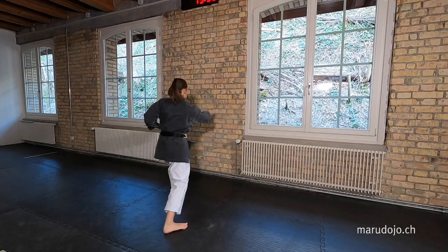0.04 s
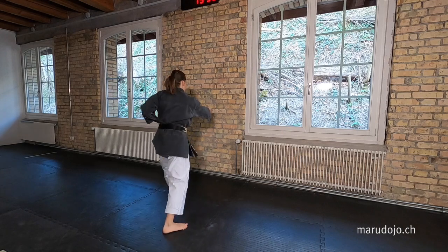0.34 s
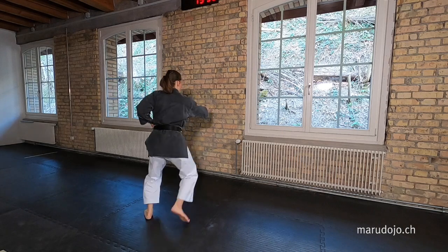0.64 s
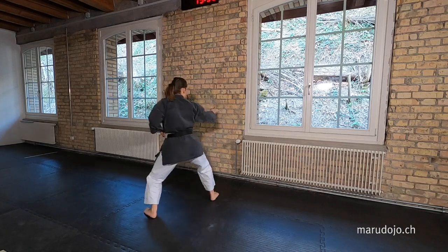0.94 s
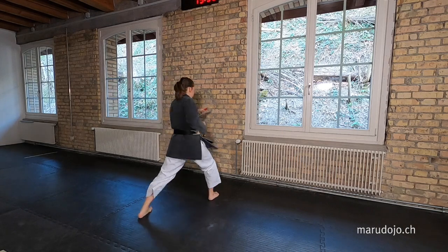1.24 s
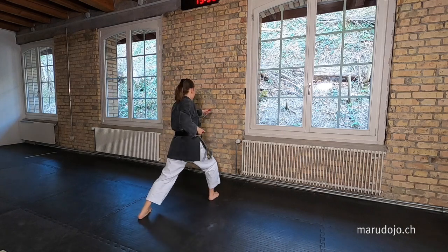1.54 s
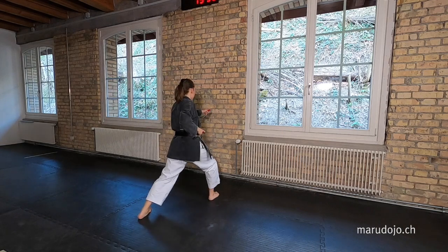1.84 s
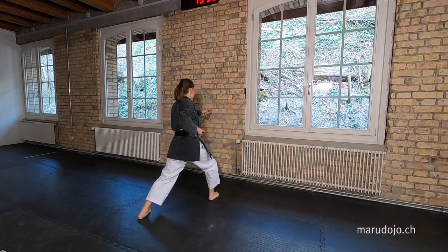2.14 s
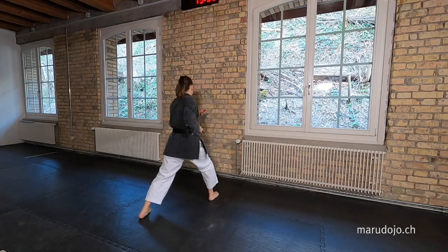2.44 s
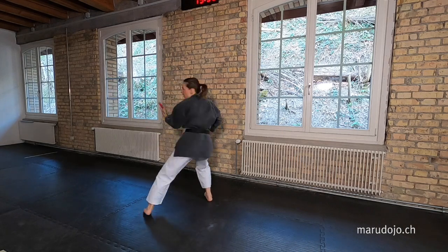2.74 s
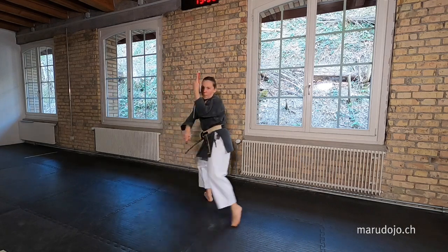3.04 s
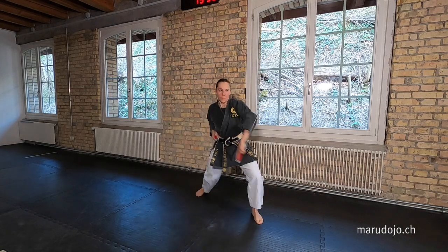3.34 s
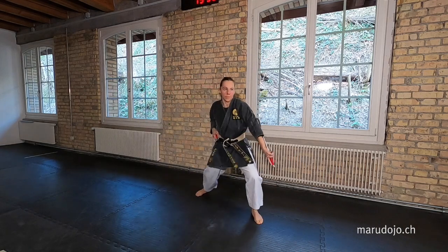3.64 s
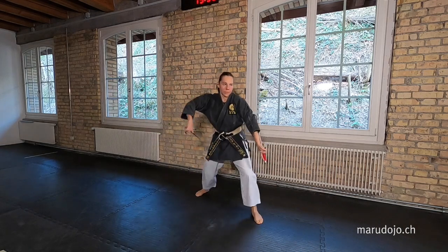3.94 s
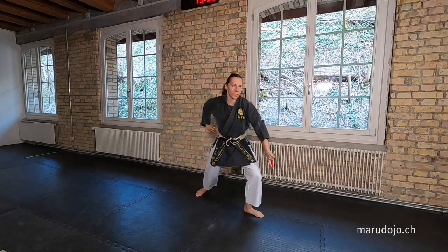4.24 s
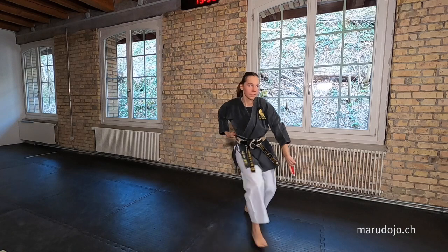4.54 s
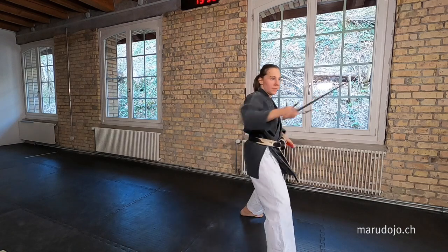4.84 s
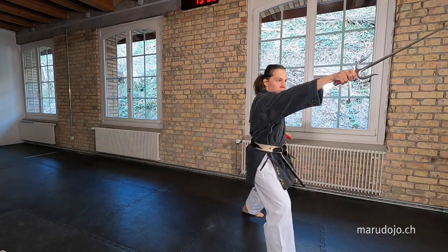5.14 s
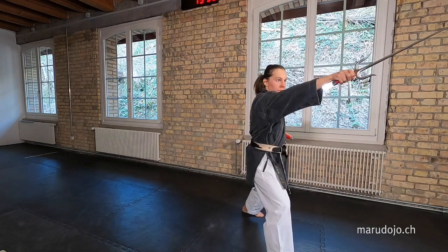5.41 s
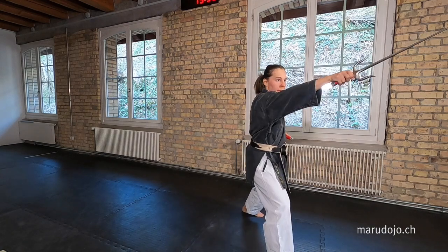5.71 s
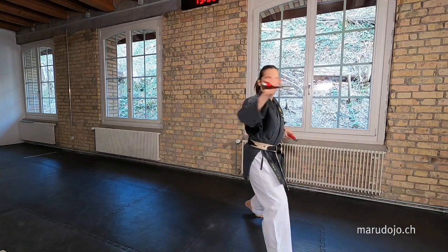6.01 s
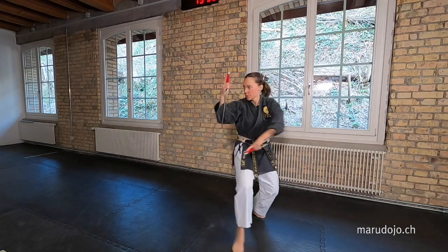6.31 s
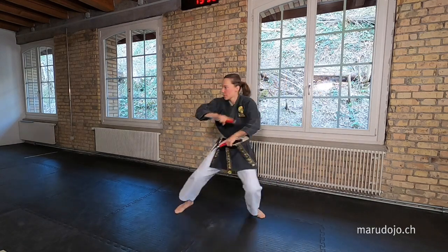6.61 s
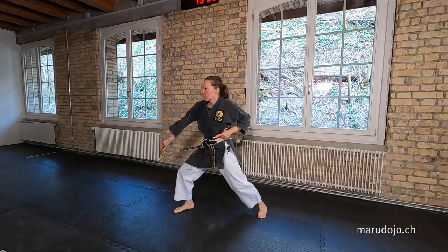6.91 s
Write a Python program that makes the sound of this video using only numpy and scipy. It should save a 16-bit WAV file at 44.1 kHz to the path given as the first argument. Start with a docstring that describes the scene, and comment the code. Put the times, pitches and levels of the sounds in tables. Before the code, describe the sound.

In a quiet training hall, cloth slides, flaps and snaps as someone steps and strikes in a thick cotton uniform. After a short lull come two stronger flurries, with swishes of arms and steel weapons and dull barefoot landings. A barely audible wavering tone rises in the next pause, then one last burst of rustling ends with a thump. The stereo microphone picks up the movements clearly, along with a light echo.

```python
"""A heavy cotton uniform rustles as a martial artist steps, turns and strikes with short steel weapons.
Each move starts with cloth sliding on cloth, sweeps through the air with a swish, and ends with sleeves
and trouser legs flapping. Folds crack as they snap tight, bare feet thump on the mat, and the brick
training hall echoes. In a pause, a faint tone rises just above the still air."""
import sys
import numpy as np
from scipy import signal
from scipy.fft import rfft, irfft, next_fast_len
from scipy.io import wavfile
from scipy.ndimage import uniform_filter1d, map_coordinates

SR = 44100
rng = np.random.default_rng(int(sys.argv[2]) if len(sys.argv) > 2 else 0)


def put_to_file(sound):
    """Save the sound as 16-bit audio at rate SR, in the file named by the first command-line argument."""
    columns = np.atleast_2d(sound).T  # one column per channel
    safe = np.clip(columns, -1, 1)
    whole_steps = np.round(safe * 32767)
    wavfile.write(sys.argv[1], SR, whole_steps.astype(np.int16))


N = 307377

# loose cloth flapping as a limb speeds up or stops dead:
# (time of full strength [s], rise [s], hold [s], flap strength [dB], gust strength [dB])
CLOTH_FLAPS = [(0.0, 0.028, 0.078, -48.5, -54), (0.472, 0.084, 0.051, -52, -88),
               (0.714, 0.083, 0.045, -50, -54), (1.02, 0.16, 0.094, -50.5, -58),
               (1.186, 0.019, 0.057, -40.5, -63), (1.38, 0.16, 0.058, -40, -44),
               (1.521, .06, 0.07, -52, -47), (2.584, 0.0097, 0.4, -58, -94),
               (3.032, 0.18, 0.018, -48.5, -69), (3.1, .08, 0.13, -53.5, -79),
               (3.387, 0.1, .04, -44.5, -51.5), (3.489, 0.076, 0.039, -45, -50),
               (4.01, 0.13, 0.032, -60, -67), (4.465, 0.14, 0.07, -45.5, -48.5),
               (4.567, 0.031, .05, -41, -47.5), (4.767, 0.069, .03, -58, -51.5),
               (4.862, .05, 0.029, -47.5, -48), (5.017, 0.076, 0.064, -42.5, -49),
               (5.227, .05, 0.097, -62.5, -65.5), (6.345, 0.08, 0.014, -44.5, -60),
               (6.452, 0.086, 0.074, -46.5, -49.5), (6.83, 0.11, 0.026, -39.5, -43.5)]
# how alike left and right are for direct sound: (frequency [Hz], likeness [1 = the same])
DIRECT_LIKENESS = [(60, 1), (1000, 0.92), (2200, 1), (4500, 0.6), (9000, 0.16), (13000, .2)]
# and for sound from all around: (frequency [Hz], likeness [1 = the same])
ROOM_LIKENESS = [(40, 0.29), (150, 0.72), (1000, 0.49), (4000, -0.07), (9000, -0.017)]


def uniform():
    """Moving limbs rub the cloth and sweep the air; flapping cloth adds a little of both."""
    # arm and leg strokes: (time of full speed [s], rise [s], hold [s], rubbing [dB],
    # fizz relative to rubbing [dB], swept air [dB])
    strokes = [(0.0, 0.06, 0.015, -54.5, -11.5, -49), (0.293, 0.23, 0.071, -60, -13, -62),
               (0.439, 0.016, 0.069, -46.5, -7, -46.5), (0.55, 0.089, 0.12, -47, -7, -49),
               (0.783, 0.26, 0.044, -57, -15, -52.5), (0.94, .03, .14, -52.5, -10, -52.5),
               (1.18, 0.09, 0.091, -49, -6, -46.5), (1.29, 0.076, 0.1, -46, -17, -38.5),
               (2.543, 0.15, .03, -63, -7.5, -65.5), (2.583, .02, .03, -53, -10, -62),
               (2.705, 0.091, 0.065, -51, -8, -56), (2.903, 0.11, .04, -50.5, -9.5, -52),
               (2.982, 0.068, 0.075, -35.5, -7.5, -42), (3.196, 0.13, 0.055, -50, -20, -43.5),
               (3.272, 0.077, 0.022, -41.5, -11, -44.5), (3.367, 0.088, 0.096, -51.5, -11.5, -42),
               (3.973, 0.43, 0.081, -67, -4.5, -68.5), (4.102, 0.016, .05, -56, -11, -59),
               (4.256, 0.16, 0.069, -48, -8.5, -53), (4.493, 0.11, 0.032, -44.5, -4.5, -39.5),
               (4.574, 0.067, 0.01, -37.5, -7.5, -39), (4.818, 0.13, 0.14, -47, -13, -48),
               (5.23, 0.069, 0.044, -65, -7, -61), (5.924, 0.12, .08, -65, -6.5, -67.5),
               (6.07, 0.19, 0.055, -64, -7.5, -57.5), (6.216, 0.16, 0.089, -52, -11, -53),
               (6.355, 0.065, 0.036, -39.5, -9, -45.5), (6.426, 0.013, 0.073, -37.5, -8.5, -38),
               (6.722, .05, 0.049, -42.5, -11, -41)]
    flaps = [(*when, db) for *when, db, gust in CLOTH_FLAPS]
    rubs = [(*when, db) for *when, db, fizz, air in strokes]
    rubs += [(*when, db - 9) for *when, db in flaps]
    fizzes = [(*when, db + fizz) for *when, db, fizz, air in strokes]
    sweeps = [(*when, air) for *when, db, fizz, air in strokes]
    sweeps += [(*when, db - 5) for *when, db in flaps]
    return (rubbing(sliding_level(rubs), sliding_level(fizzes))
            + sweeping(level(sweeps, fall_db_per_s=126))
            + flapping(level(flaps, fall_db_per_s=166)))


def rubbing(rub_db, fizz_db):
    """Cotton slides on cotton: the folds rasp and the weave fizzes, both with the same uneven stroke."""
    # tone of rubbing folds: (frequency [Hz], level [dB])
    rasp_tone = [(600, -31), (1100, -9), (1600, -6), (2200, -0.5), (3000, -3.5), (4000, -6.5),
                 (5200, -10.5), (7000, -16.5), (12000, -42)]
    # tone of the weave: (frequency [Hz], level [dB])
    fizz_tone = [(2000, -14), (4000, -3.5), (5500, -2.5), (7000, -9), (9000, -7.5), (12000, -20),
                 (14000, -24), (15500, -36)]
    unevenness = amp(0.49 * wobble(45))
    rasp = coloured(folds(slips(per_s=1500, scatter_db=3.5, smooth_db=5), patchy_db=1.5), rasp_tone)
    fizz = coloured(folds(slips(per_s=450, scatter_db=-2, smooth_db=6.5), patchy_db=2.5), fizz_tone)
    return unevenness * (amp(rub_db - 5) * rasp + amp(fizz_db - 2) * fizz)


def sweeping(sweep_db):
    """Sleeves and steel shafts cut the air with a hollow rush."""
    # tone of swept air: (frequency [Hz], level [dB])
    air_tone = [(200, -50), (450, -4), (650, -1.5), (950, -0.5), (1300, -2.5), (1800, -5.5), (3500, -47.5)]
    swirls = folds(slips(per_s=500, scatter_db=4.5, smooth_db=6.5), patchy_db=3)
    return amp(sweep_db - 4.5 + 0.24 * wobble(24)) * coloured(swirls, air_tone)


def flapping(flap_db):
    """Loose panels of cloth beat in quick uneven flicks."""
    # tone of flapping cloth: (frequency [Hz], level [dB])
    flap_tone = [(50, -44.5), (110, -9), (170, 4.5), (220, 2.5), (270, -0.5), (360, -0.5), (520, -3.5),
                 (800, -19), (2000, -66)]
    flicks = folds(slips(per_s=240, scatter_db=-1.5, smooth_db=1.5), patchy_db=0.5)
    return amp(flap_db - 4.5) * coloured(flicks, flap_tone)


def swishes():
    """Air swirls behind a fast arm and its weapon, with a hiss whose pitch follows their speed."""
    # fastest swings: (middle [s], length [s], level [dB], pitch [Hz], glide [octaves/s])
    swings = [(0.592, 0.13, -53.5, 653, -0.5), (1.30, 0.059, -49, 1188, -2), (2.967, 0.053, -47, 980, 7.5),
              (3.057, 0.091, -40, 1875, 3), (3.182, 0.076, -44.5, 827, -2), (4.6, 0.17, -47, 2170, -1),
              (4.835, 0.24, -53.5, 892, 1), (6.393, 0.078, -44.5, 860, 2.5),
              (6.583, 0.14, -50.5, 898, -4.5)]
    t = np.arange(-SR // 4, SR // 4) / SR
    track = np.zeros((2, N))
    for s, length, db, hz, glide in swings:
        noise = rng.standard_normal((2, len(t)))
        swirls = unit(filtered(noise, lambda f: 1 / (1 + (f / (0.25 * hz)) ** 4)))
        phase = 2 * np.pi * np.cumsum(hz * 2 ** (glide * t)) / SR
        hiss = swirls[0] * np.cos(phase) + swirls[1] * np.sin(phase)  # lifts low noise up to the pitch
        swell = np.exp(-2 * (t / length) ** 2)
        add(track, s + t[0], amp(db) * swell * hiss[None])
    return track


def snaps():
    """A fold pulled tight gives a short crack."""
    # snapping folds: (time [s], strength [dB], pitch [Hz], time to fade by 60 dB [s])
    cracks = [(0.43, -42.5, 1520, 0.044), (0.44, -34.5, 2220, 0.015), (0.477, -36, 3100, 0.083),
              (0.6875, -29, 2700, 0.0086), (1.181, -33, 760, 0.041), (1.215, -30, 970, 0.06),
              (1.362, -33, 1000, 0.03), (1.364, -34.5, 2400, 0.04), (1.559, -42.5, 1020, 0.13),
              (2.577, -49, 1310, 0.13), (2.581, -47, 3640, 0.11), (3.096, -33.5, 664, 0.069),
              (3.433, -38, 980, .04), (3.784, -49.5, 1270, 0.045), (4.1, -51.5, 930, 0.045),
              (4.383, -39.5, 1180, 0.044), (4.586, -30, 2600, 0.1), (4.755, -40, 776, 0.11),
              (5.047, -32, 700, 0.049), (5.227, -41.5, 1220, 0.097), (5.226, -44.5, 2500, 0.05),
              (6.034, -47.5, 1160, 0.032), (6.2371, -35, 1060, 0.076), (6.235, -35, 2620, 0.053),
              (6.688, -34, 740, 0.056)]
    track = np.zeros((2, N))
    for s, db, hz, fade_s in cracks:
        add(track, s, amp(db + 1.5) * burst(hz, fade_s, sharpness=2.6, attack_s=0.0002, dull_above=2.6))
    return track


def thumps():
    """Feet and heavy hems land softly, with almost no treble."""
    # dull blows: (time [s], strength [dB], pitch [Hz])
    blows = [(0.723, -36.5, 350), (1.188, -34.5, 188), (1.416, -32.5, 200), (3.353, -33, 310),
             (3.397, -29, 128), (4.533, -27, 271), (5.002, -25, 340), (5.041, -37, 414), (5.224, -38, 237),
             (6.06, -38, 328), (6.803, -27.5, 366), (6.827, -32.5, 102)]
    track = np.zeros((2, N))
    for s, db, hz in blows:
        thud = burst(hz, fade_s=0.12, sharpness=3.1, attack_s=0.0025, dull_above=9.5)
        add(track, s, amp(db - 4.5) * thud)
    return track


def floor():
    """The springy floor gives under each step with a deep rumble."""
    # weight landing: (time [s], strength [dB])
    steps = [(0.02, -61), (0.16, -63), (0.75, -51), (1.03, -45.5), (1.24, -52), (1.47, -52), (1.62, -55),
             (3.371, -54), (3.45, -52), (3.54, -50), (4.79, -48), (4.86, -46.5), (5.01, -45), (5.17, -61),
             (6.20, -57), (6.44, -62), (6.86, -49)]
    # tone of the bending floor: (frequency [Hz], level [dB])
    floor_tone = [(12, -21), (27, 16), (42, 2), (100, -46)]
    rise_s, hold_s = 0.065, 0.019
    bend_db = level([(s, rise_s, hold_s, db) for s, db in steps], fall_db_per_s=142)
    return amp(bend_db - 3.5) * coloured(rng.standard_normal((2, N)), floor_tone)


def gusts():
    """Fast limbs push a low puff of air with each flap."""
    # tone of pushed air: (frequency [Hz], level [dB])
    gust_tone = [(25, -32), (50, -2.5), (80, -1.5), (120, -0.5), (170, -7), (350, -54)]
    gust_db = level([(*when, gust) for *when, db, gust in CLOTH_FLAPS], fall_db_per_s=156)
    return amp(gust_db - 4) * coloured(rng.standard_normal((2, N)), gust_tone)


def hall(sound):
    """Brick walls and windows send back a blurred echo, boosted where the hall rings."""
    # how long the echo lasts: (frequency [Hz], time to fade by 60 dB [s])
    fade_times = [(150, 1.03), (700, 0.63), (1300, 1), (2200, 0.59), (4000, 0.66), (12000, 0.21)]
    # tone of the echo: (frequency [Hz], level [dB])
    echo_tone = [(100, -11.5), (200, -1), (500, -3), (800, -13.5), (1900, 0.5), (5000, -1.5), (9000, -5)]
    # where the hall rings: (frequency [Hz], width [Hz], boost [dB])
    rings = [(183, 46, 8.5), (332, 73, 0), (1200, 850, 9)]
    hz, t, bands = signal.stft(rng.standard_normal((2, SR)), SR, nperseg=256)
    fading = bands * amp(-60 * t / along(fade_times, hz)[:, None])
    tail = spread(signal.istft(fading, SR, nperseg=256)[1], ROOM_LIKENESS)
    tail = np.pad(tail / np.linalg.norm(tail[0]), ((0, 0), (SR // 200, 0)))  # arrives 5 ms late
    echo = signal.fftconvolve(sound, tail, axes=1)[:, :N]
    ring_db = lambda f: sum(db / (1 + (2 * (f - centre) / width) ** 2) for centre, width, db in rings)
    return filtered(echo, lambda f: amp(along(echo_tone, f) + ring_db(f)))


def faint_tone():
    """A thin, wavering tone rises in the pause."""
    # path of the tone: (time [s], pitch [Hz], level [dB])
    path = [(5.4, 490, -100), (5.55, 515, -71), (5.72, 561, -69.5), (5.9, 586, -97)]
    times, pitches, levels = np.transpose(path)
    t = np.arange(N) / SR
    hz = np.interp(t, times, pitches) * (1 + 0.045 * wobble(33))
    return amp(np.interp(t, times, levels)) * np.sin(2 * np.pi * np.cumsum(hz) / SR)


def still_air():
    """The quiet hall has a steady, low hush."""
    # tone of the hush: (frequency [Hz], level [dB])
    hush_tone = [(15, -34.5), (25, -5), (98, -27.5), (146, -5), (344, -13.5), (383, -13.5), (462, -18),
                 (515, -10), (573, -23.5), (655, -17.5), (709, -23), (790, -26), (879, -23), (1280, -22.5),
                 (15000, -52)]
    return amp(-69) * coloured(rng.standard_normal((2, N)), hush_tone, ROOM_LIKENESS)


def level(movements, fall_db_per_s):
    """Joint level in dB of (time, rise, hold, dB) movements: each builds up, holds, then dies away."""
    t = np.arange(0, N / SR, 0.002)
    power = 0
    for s, rise, hold, db in movements:
        rise_db = -20 * np.minimum((t - s) / rise, 0) ** 2
        fall_db = -fall_db_per_s * np.maximum(t - s - hold, 0)
        power += amp(db + rise_db + fall_db) ** 2
    return np.interp(np.arange(N) / SR, t, 10 * np.log10(power + 1e-20))


def sliding_level(movements):
    """Level in dB of sliding cloth: each stroke plus its quieter, slower settling."""
    usual_db = np.mean([db for *when, db in movements])
    # settling varies a little less than the strokes do
    settling = [(*when, usual_db - 5 + 0.91 * (db - usual_db)) for *when, db in movements]
    stroke_power = amp(level(movements, fall_db_per_s=134)) ** 2
    settle_power = amp(level(settling, fall_db_per_s=50.5)) ** 2
    return 10 * np.log10(stroke_power + settle_power)


def slips(per_s, scatter_db, smooth_db):
    """Tiny jerks of uneven size at random moments, over a smooth rubbing noise."""
    moments = rng.random(N) < per_s / SR
    sizes = amp(scatter_db * np.clip(rng.standard_normal(N), -2, 2))
    jerks = unit(moments * sizes * rng.standard_normal((2, N)))
    return unit(jerks + amp(smooth_db) * rng.standard_normal((2, N)))


def folds(pair, patchy_db):
    """Shifting folds briefly make some pitches louder and others softer."""
    bands = signal.stft(pair, nperseg=512)[2]
    patches = uniform_filter1d(rng.standard_normal(bands.shape[1:]), size=5, axis=0)  # blur in pitch
    patches = uniform_filter1d(patches, size=8, axis=1)  # blur in time
    return signal.istft(bands * amp(patchy_db * unit(patches)), nperseg=512)[1][:, :N]


def burst(hz, fade_s, sharpness, attack_s, dull_above):
    """A dying puff of peak 1 that rings at hz; soft cloth dulls it beyond dull_above times hz."""
    t = np.arange(SR // 4) / SR
    grain = np.sign(rng.standard_normal((2, len(t))))
    puff = grain * amp(-60 * t / fade_s) * (1 - np.exp(-t / attack_s))
    width = hz / sharpness
    ringing = lambda f: 1j * f * width / (hz * hz - f * f + 1j * f * width)
    dulling = lambda f: 1 / (1 + 1j * f / (dull_above * hz)) ** 2
    ring = spread(filtered(puff, lambda f: ringing(f) * dulling(f)), DIRECT_LIKENESS)
    return ring / np.abs(ring).max()


def coloured(pair, tone, likeness=DIRECT_LIKENESS):
    """Two noises become one stereo sound of strength 1 with the given tone."""
    return unit(spread(filtered(pair, lambda hz: amp(along(tone, hz))), likeness))


def spread(pair, likeness):
    """Blend two unrelated signals into a left and right that are partly alike."""
    angle = lambda hz: np.arccos(np.clip(along(likeness, hz), -1, 1)) / 2
    mid, side = filtered(pair, lambda hz: np.array([np.cos(angle(hz)), np.sin(angle(hz))]))
    return np.array([mid + side, mid - side])


def filtered(x, gain_at):
    """Scale each frequency in x by gain_at(frequency)."""
    n = x.shape[-1]
    padded = next_fast_len(n + 8192)
    return irfft(rfft(x, padded) * gain_at(np.fft.rfftfreq(padded, 1 / SR)), padded)[..., :n]


def along(points, hz):
    """Read between (frequency, value) points on a log frequency scale."""
    frequencies, values = np.transpose(points)
    return np.interp(np.log(hz + 1), np.log(frequencies + 1), values)


def wobble(per_s):
    """A smooth curve through per_s random points a second."""
    return map_coordinates(rng.standard_normal(int(N * per_s / SR) + 4), [np.arange(N) * per_s / SR])


def amp(db):
    """Turn decibels into a gain."""
    return 10 ** (np.asarray(db) / 20)


def unit(x):
    """Scale x to an average strength (rms) of 1."""
    return x / np.sqrt(np.mean(x ** 2) + 1e-20)


def add(track, s, sound):
    """Mix a sound into the track at s seconds."""
    part = track[:, max(round(s * SR), 0):][:, :sound.shape[1]]
    part += sound[:, :part.shape[1]]


def scene():
    """The moving uniform and its blows in the quiet hall."""
    cloth = uniform() + swishes()
    blows = snaps() + thumps()
    hush = still_air()
    rumble = floor() + gusts()
    echo = hall(amp(-11) * cloth + amp(-8.5) * blows)
    return cloth + blows + rumble + echo + faint_tone() + hush


def record(dry):
    """The microphone's two sides differ a little in tone, the left lags, and the top treble is cut."""
    # lean to one side: (frequency [Hz], left minus right [dB])
    balance = [(60, 2.2), (280, -1.4), (1000, -0.2), (2400, 2), (5000, 0.5), (9000, -1.5), (13000, -3)]
    top_hz = 15700
    lean = lambda hz: amp(np.outer([0.5, -0.5], along(balance, hz)))
    lag = lambda hz: np.exp(np.outer([-1j, 1j], np.pi * hz / SR))  # one sample between the sides
    return filtered(dry, lambda hz: lean(hz) * lag(hz) * (hz < top_hz))


dry = scene()
out = record(dry)
put_to_file(out)
```